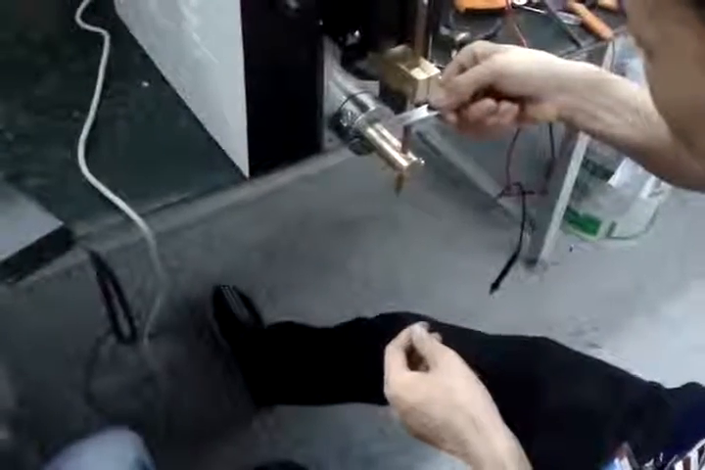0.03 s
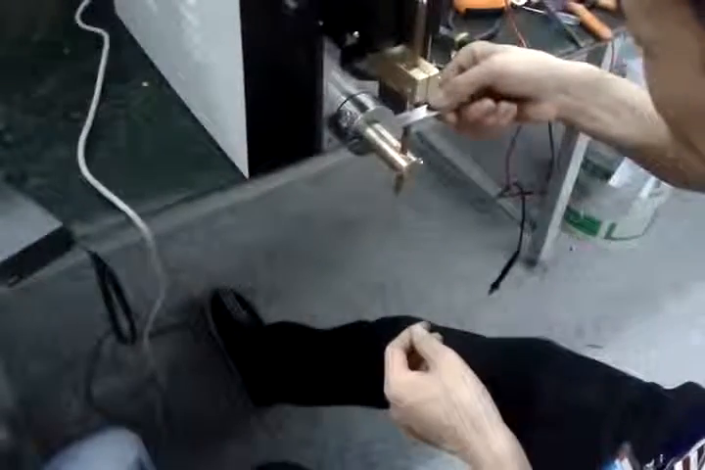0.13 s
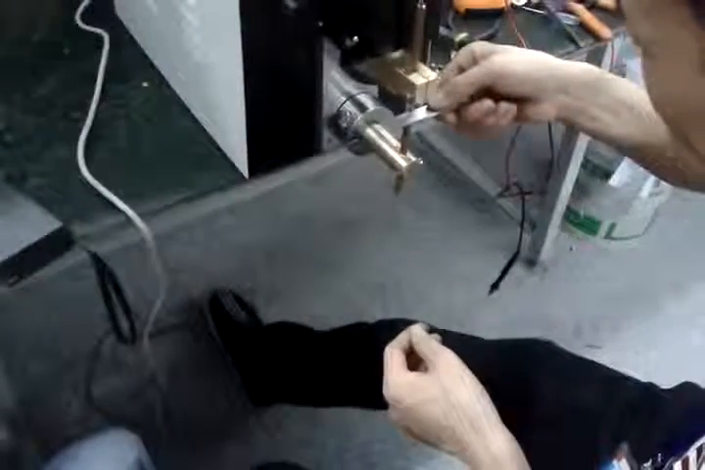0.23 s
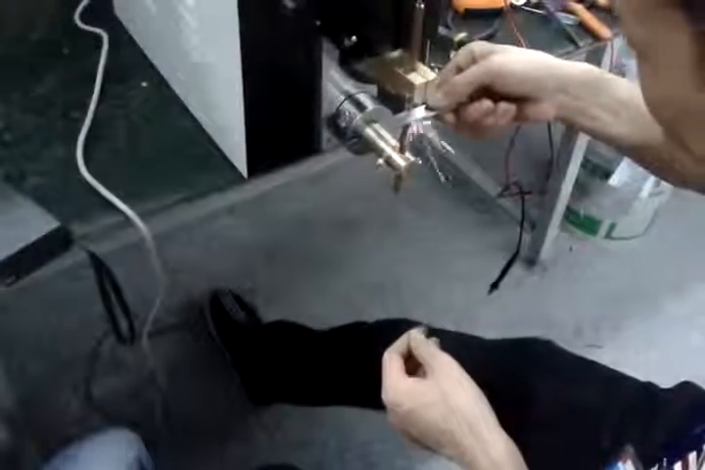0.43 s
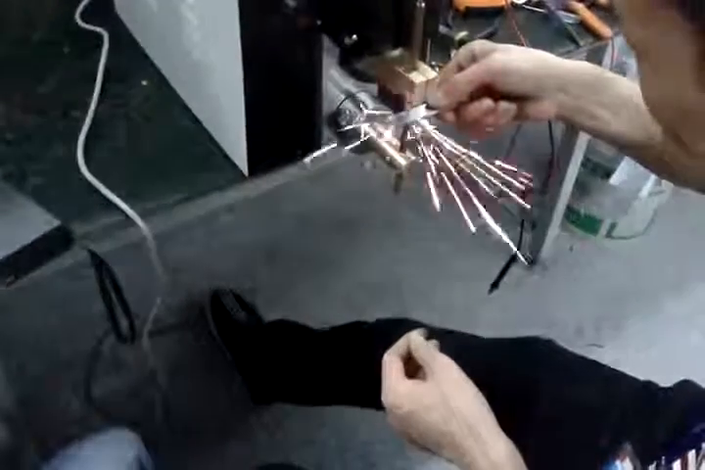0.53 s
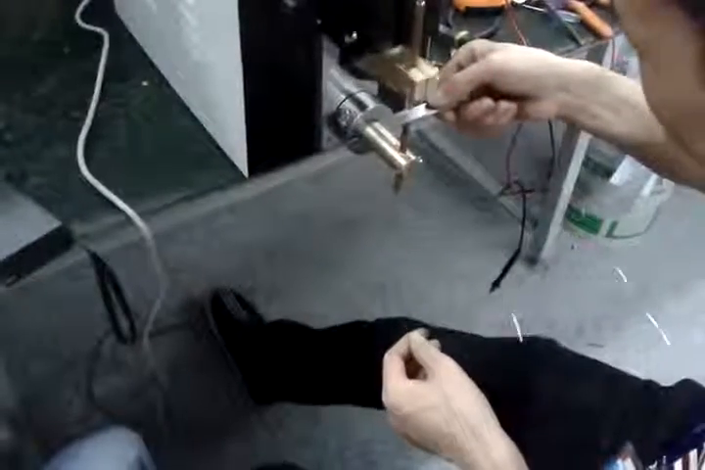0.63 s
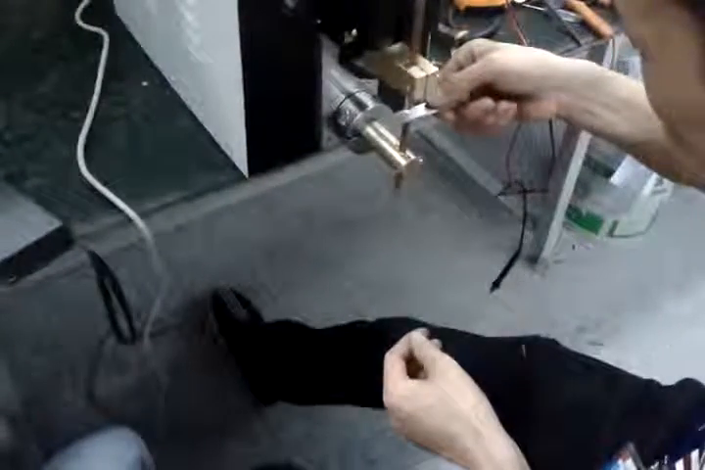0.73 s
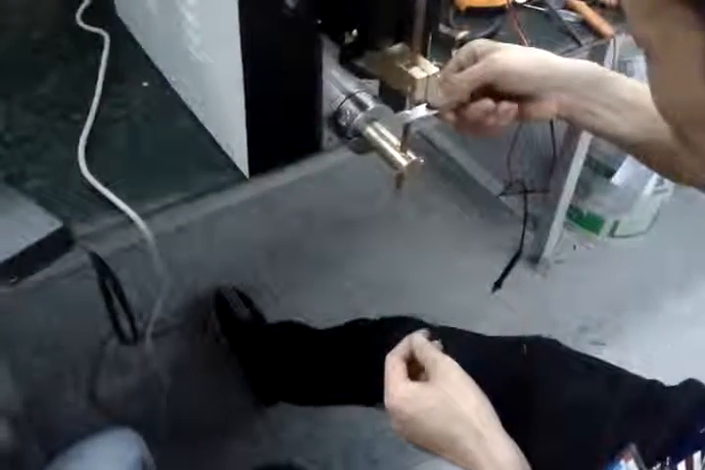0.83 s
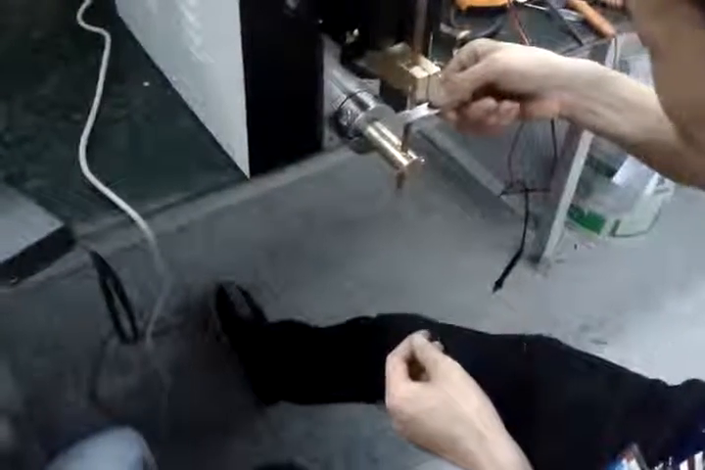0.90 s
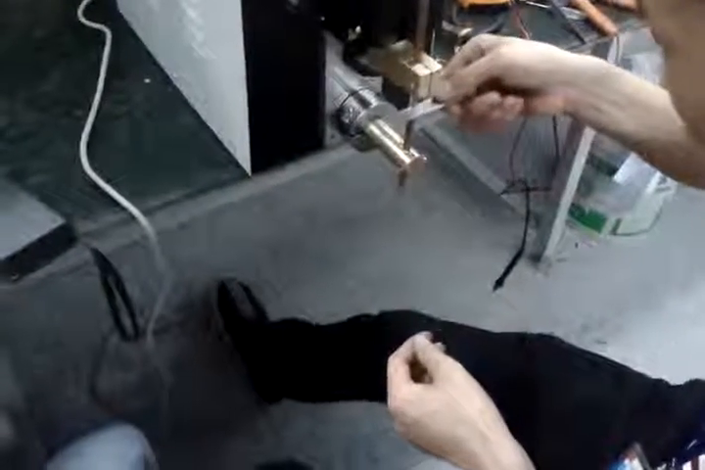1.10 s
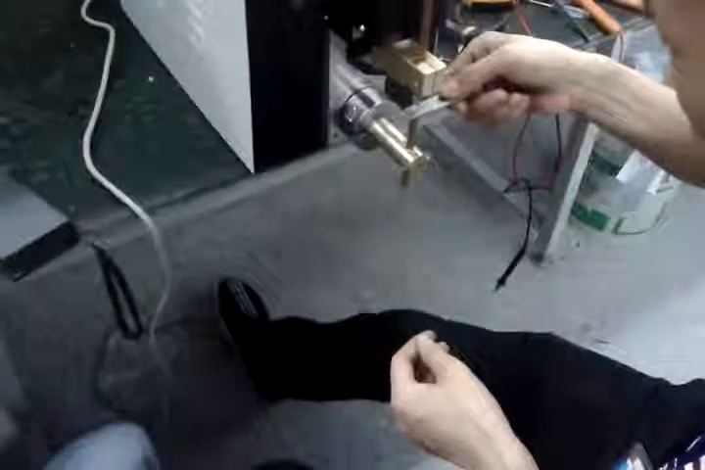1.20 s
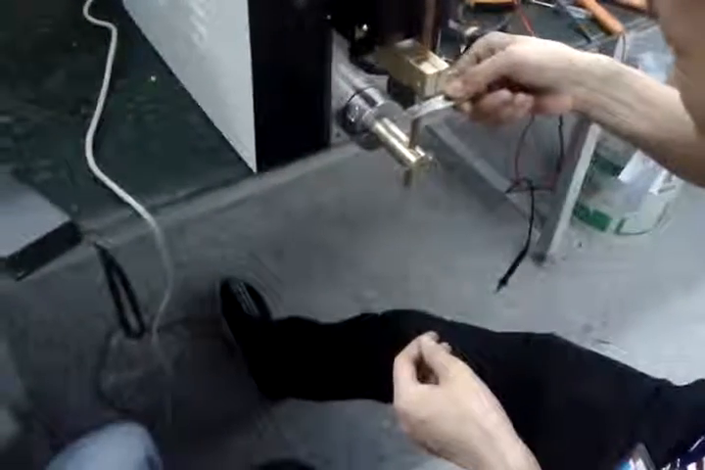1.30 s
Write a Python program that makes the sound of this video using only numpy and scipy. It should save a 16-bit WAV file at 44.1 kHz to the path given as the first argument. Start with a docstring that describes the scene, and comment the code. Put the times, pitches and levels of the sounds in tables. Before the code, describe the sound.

One spot weld in a workshop: a clack, buzzing sparks, a metallic bang and hissing air.

```python
"""One weld on a bench spot welder

A valve clacks and the electrodes close with a thud and a thin ring. Mains current buzzes in the frame
while the joint spits sparks; then the arm is released with a bang, air hisses away and the arm
settles on its stop. The workshop reverberates over a steady background rush."""
import sys
import numpy as np
from scipy import signal
from scipy.fft import rfft, irfft, next_fast_len
from scipy.io import wavfile
from scipy.ndimage import map_coordinates

SR = 44100
rng = np.random.default_rng(int(sys.argv[2]) if len(sys.argv) > 2 else 0)


def log_audio(samples):
    """Write samples as a 16-bit WAV file to the path given in sys.argv[1]."""
    # one column per channel
    frames = np.atleast_2d(samples).T
    # limit to full scale, then quantise
    limited = np.clip(frames, -1, 1)
    pcm = np.round(limited * 32767).astype(np.int16)
    wavfile.write(sys.argv[1], SR, pcm)


N = 59535
T = np.arange(N) / SR
WELD_ON_S, WELD_OFF_S, BUZZ_HZ = 0.5465, 0.647, 99.75
FLUTTER_DB = 2.5

# the arm closing, released and at rest: start_s, crack_db, hold_s, frame_ring_db
ARM_BLOWS = [(0.2943, -25, 0.013, -31), (0.7378, -10.5, 0.0045, -22), (1.062, -36.5, 0.027, -56)]


def amp(db):
    """Decibels to amplitude ratio."""
    return 10 ** (np.asarray(db) / 20)


def along(points, hz):
    """Interpolation of (frequency_hz, value) points on a logarithmic frequency axis."""
    freqs, values = np.transpose(points)
    return np.interp(np.log(hz + 1), np.log(freqs + 1), values)


def level(rows):
    """Amplitude envelope through (time_s, level_db) points."""
    return amp(np.interp(T, *np.transpose(rows)))


def wobble(rate):
    """Smooth random modulation: a spline through rate Gaussian values a second."""
    return map_coordinates(rng.standard_normal(2048), [T * rate], mode="wrap")


def filtered(x, response):
    """Linear filtering: the spectrum is multiplied by a frequency response."""
    size = next_fast_len(N + SR // 2)
    return irfft(rfft(x, size) * response(np.fft.rfftfreq(size, 1 / SR)), size)[:N]


def coloured(x, spectrum):
    """Spectral shaping, normalised to rms 1."""
    shaped = filtered(x, lambda hz: amp(along(spectrum, hz)))
    return shaped / np.sqrt(np.mean(shaped ** 2) + 1e-20)


def noise(spectrum):
    """Coloured Gaussian noise of rms 1."""
    return coloured(rng.standard_normal(N), spectrum)


def burst(start, attack, hold, t60):
    """Transient envelope: a rise, then exponential decay once the hold ends; times in seconds."""
    age = np.maximum(T - start, 0)
    return (1 - np.exp(-age / attack)) * amp(-60 * np.maximum(age - hold, 0) / t60)


def ring(modes, start, attack):
    """Free vibration: each struck mode is a damped sinusoid."""
    return sum(amp(db) * burst(start, attack, 0, t60) * np.sin(2 * np.pi * hz * (T - start))
               for hz, db, t60 in modes)


def beating(modes, start, attack, jitter_rad):
    """Beats: each damped mode interferes with a weaker one just above it; phase and level waver."""
    max_beat_hz = 16
    x = np.zeros(N)
    for hz, db, t60 in modes:
        phase = 2 * np.pi * hz * (T - start) + jitter_rad * wobble(34.7)
        beat = 2 * np.pi * (max_beat_hz * rng.uniform(0.493, 1) * T + rng.random())
        envelope = amp(db + FLUTTER_DB * wobble(44.82)) * burst(start, attack, 0, t60)
        x += envelope * (np.sin(phase) + 0.5 * np.sin(phase + beat))
    return x


def in_room(x, wet_db):
    """Reverberation: direct sound plus its convolution with a diffuse, decaying tail."""
    # reverberation times: frequency_hz, t60_s
    decay_times = [(100, 0.92), (500, 0.78), (2000, 0.63), (5000, 0.81), (9000, 0.68), (15000, 0.34)]
    hz, t, bands = signal.stft(rng.standard_normal(SR), SR, nperseg=256)
    decay = amp(-60 * t / along(decay_times, hz)[:, None])
    tail = signal.istft(bands * decay, SR, nperseg=256)[1]
    response = np.pad(tail, (SR // 200, 0)) / np.linalg.norm(tail)  # 5 ms late
    return x + amp(wet_db) * signal.fftconvolve(x, response)[:N]


def workshop():
    """Ambient noise: a dull broadband rush with a faint, wavering tone."""
    # spectrum of the rush: frequency_hz, relative_db
    spectrum = [(25, -26), (50, -8.5), (85, -1), (125, -3.5), (260, -2.5), (500, -5), (900, -12),
                (1400, -9.5), (2200, -9.5), (3500, -14.5), (5300, -17), (7500, -35), (10000, -42.5),
                (16000, -39)]
    # envelope of the rush: time_s, level_db
    envelope = [(0, -37), (.2, -40.5), (.5, -40), (1.35, -45)]
    whine_hz, whine_db = 3610, -55.5
    whine = amp(whine_db + 1.3 * wobble(17)) * np.sin(2 * np.pi * whine_hz * T + wobble(37))
    return level(envelope) * noise(spectrum) + whine


def air():
    """Turbulent flow: the cylinder vents in a falling gush, then hisses until the arm is home."""
    # spectrum of the gush: frequency_hz, relative_db
    gush_spectrum = [(40, -31), (150, -3), (300, 11.5), (500, 9.5), (700, 5.5), (1400, -0.5), (2300, -2),
                     (4000, -6), (4900, -20), (5800, -33), (7500, -17), (16000, -44)]
    # spectrum of the leak: frequency_hz, relative_db
    leak_spectrum = [(40, -26), (170, 9), (300, 10.5), (500, 9), (700, 3), (1400, 2), (2000, 0.5),
                     (3300, -6.5), (5200, 3), (7000, -14), (9000, -19.5), (12000, -31), (16000, -38)]
    start_s, end_s = 0.731, 1.127
    gush_db, fall_db_per_s, leak_db = -22, 73, -34.5
    gush = amp(gush_db) * burst(start_s, 0.0055, 0.014, 60 / fall_db_per_s) * noise(gush_spectrum)
    leak = amp(leak_db) * burst(start_s, 0.062, end_s - start_s, 1.56) * noise(leak_spectrum)
    return (gush + leak) * amp(0.85 * wobble(89.13))


def valve():
    """Impact noise: valve and linkage switch with bright clacks and a short ping."""
    # clacks: start_s, level_db, hold_s
    clacks = [(.2258, -33, 0.0024), (0.2406, -22.5, 0.0086), (.251, -20, 0.0076), (0.932, -36, 0.0024)]
    # spectrum of a clack: frequency_hz, relative_db
    spectrum = [(40, -38), (200, 8), (500, -2.5), (1200, -10), (3000, -2.5), (4300, -1), (5300, 6.5),
                (6500, -3.5), (9000, -7.5), (12000, -9), (16000, -17)]
    # mode of the valve: pitch_hz, level_db, t60_s
    ping = [(4330, -22.5, 0.046)]
    rattle = sum(amp(db) * burst(start, 0.00046, hold, 0.027) * noise(spectrum)
                 for start, db, hold in clacks)
    return in_room(rattle, wet_db=-1.5) + ring(ping, clacks[0][0], attack=0.005)


def housing():
    """Heavy damping: the housing's modes die quickly, giving dull thuds as the mechanism shifts."""
    # thuds: start_s, gain_db
    thuds = [(.248, -18.5), (.297, -8), (.759, -24), (.793, -11.5)]
    # modes of the housing: pitch_hz, relative_db, t60_s
    modes = [(200.4, -1.5, 0.045), (237, 0, 0.067), (500, -9, .05), (772, -7.5, 0.044), (1180, -20, 0.08)]
    return in_room(sum(amp(db) * ring(modes, start, attack=0.0052) for start, db in thuds), wet_db=-2.5)


def metal_parts():
    """Light damping: the electrodes, the arm and its stop each ring on after a blow."""
    # modes of the closing electrodes: pitch_hz, level_db, t60_s
    electrode_modes = [(4072, -31, .65), (5103, -42, .5), (5400, -41, .5), (8732, -43, .52),
                       (12320, -53, .5), (13250, -42, .4)]
    # modes of the arm springing back: pitch_hz, level_db, t60_s
    arm_modes = [(4720, -26, 0.28), (4869, -30, 0.31), (5210, -36, 0.32), (1455, -24, 0.4)]
    # modes of the stop: pitch_hz, level_db, t60_s
    stop_modes = [(1997, -36.5, 0.82), (5430, -34, 0.38), (8540, -45, 0.33)]
    close_s, release_s, rest_s = [blow[0] for blow in ARM_BLOWS]
    return (beating(electrode_modes, close_s, attack=0.0047, jitter_rad=0.98)
            + beating(arm_modes, release_s, attack=0.0027, jitter_rad=0.49)
            + beating(stop_modes, rest_s, attack=0.022, jitter_rad=1.0))


def arm():
    """Impulsive excitation: each blow of the arm is a broadband crack that sets the frame ringing."""
    # spectrum of a crack: frequency_hz, relative_db
    spectrum = [(40, -40), (150, -1), (400, -0.5), (850, 2), (1500, -1.5), (2200, -5), (4100, -7.5),
                (4800, 3), (6000, -3.5), (8000, -17), (10000, -21.5), (16000, -32)]
    # modes of the frame: pitch_hz, relative_db, t60_s
    frame_modes = [(85.9, -11, 2.8), (180, -5.5, 1.5), (226, 1, 0.7), (244.8, -11.5, 0.9), (286.4, -7, 1.5),
                   (318, -3.5, .8), (422, -5.5, 1.33), (481, -5, 1.34), (780, -18, 1.1), (914, -23, 0.48),
                   (1360, -18, 0.26)]
    cracks, frame = np.zeros((2, N))
    for start, crack_db, hold, ring_db in ARM_BLOWS:
        cracks += amp(crack_db) * burst(start, 0.00019, hold, 0.046) * noise(spectrum)
        frame += amp(ring_db) * beating(frame_modes, start, attack=0.013, jitter_rad=0.92)
    return in_room(cracks, wet_db=-4) + frame


def transformer():
    """Forced vibration: the welding current shakes the frame at twice the mains frequency."""
    # partials of the buzz: harmonic_number, rms_db
    harmonics = [(1, -39), (2, -27), (3, -36.5), (4, -33), (5, -31), (6, -35.5), (7, -47), (8, -37.5),
                 (10, -43.5), (13, -41), (14, -40)]
    buzz = np.zeros(N)
    for k, db in harmonics:
        hold = WELD_OFF_S - WELD_ON_S + 0.0044 * k  # upper harmonics last longer
        envelope = amp(db + FLUTTER_DB * wobble(24.9)) * burst(WELD_ON_S, 0.015, hold, t60=0.16)
        phase = 2 * np.pi * (k * BUZZ_HZ * T + rng.random()) + 0.055 * k * wobble(39.7)
        buzz += envelope * np.sin(phase)
    return in_room(np.sqrt(2) * buzz, wet_db=-15)


def sparks():
    """Amplitude modulation: dense pops of molten metal surge with each half cycle of the current."""
    # envelope of the sizzle: time_s, level_db
    envelope = [(.52, -110), (.545, -32), (.555, -31), (.59, -26.5), (.63, -20), (.658, -20), (.685, -22),
                (.73, -23.5), (.78, -27), (.9, -100)]
    # spectrum of the sizzle: frequency_hz, relative_db
    spectrum = [(40, -27), (200, 2), (700, 3), (1400, -1.5), (2500, -1), (3800, 1), (5200, 5.5), (7500, -8),
                (11000, -11), (16000, -17.5)]
    pops = rng.standard_normal(N) * amp(3 * rng.standard_normal(N) + wobble(200))
    surge = amp(1.1 * np.cos(2 * np.pi * BUZZ_HZ * (T - WELD_ON_S)))
    return in_room(level(envelope) * coloured(pops * surge, spectrum), wet_db=-16.5)


def spit():
    """Expulsion: a last large squirt of molten metal radiates a short noise burst."""
    # the squirt: start_s, level_db, hold_s
    squirts = [(.6965, -16, 0.0085)]
    # its spectrum: frequency_hz, relative_db
    spectrum = [(40, -29), (250, 12), (700, -4), (1350, 8.5), (2400, -4.5), (3600, 2), (5200, 0.5),
                (7000, -10.5), (9000, -28), (11300, -14), (14000, -12.5), (16000, -20)]
    direct = sum(amp(db) * burst(start, 0.00074, hold, 0.035) * noise(spectrum)
                 for start, db, hold in squirts)
    return in_room(direct, wet_db=0)


def scene():
    """Superposition: the welder's sources and the background add in one channel."""
    mechanism = valve() + arm() + housing() + metal_parts()
    return (mechanism + transformer() + sparks() + spit() + air() + workshop())[None]


def record(dry):
    """Soft saturation rounds the highest peaks; a low-pass filter limits the bandwidth."""
    ceiling, cutoff_hz = 0.72, 15800
    rounded = dry[0] / (1 + np.abs(dry[0] / ceiling) ** 6) ** (1 / 6)
    return filtered(rounded, lambda hz: hz < cutoff_hz)[None]


dry = scene()
out = record(dry)
log_audio(out)
```